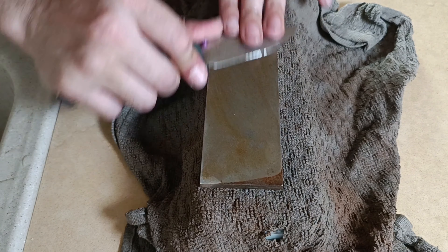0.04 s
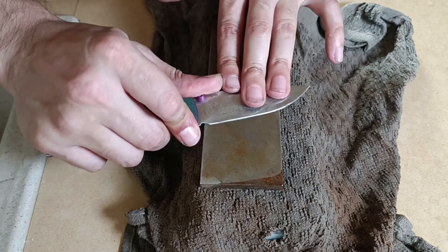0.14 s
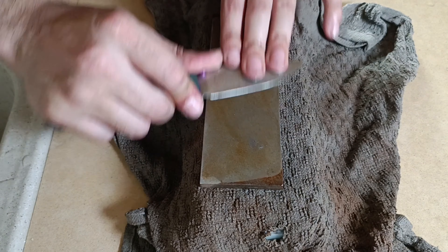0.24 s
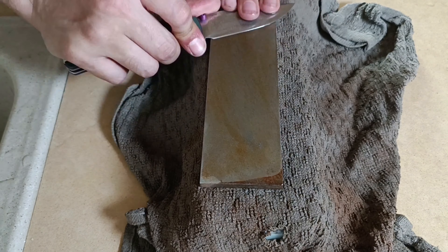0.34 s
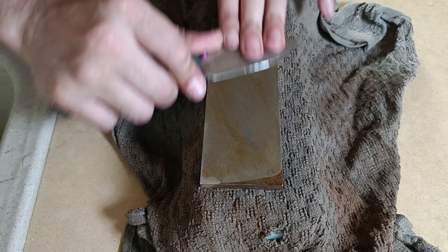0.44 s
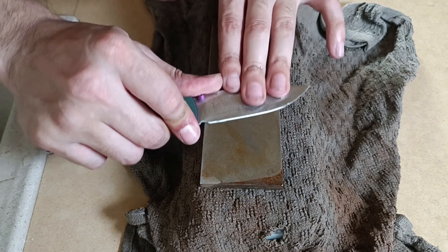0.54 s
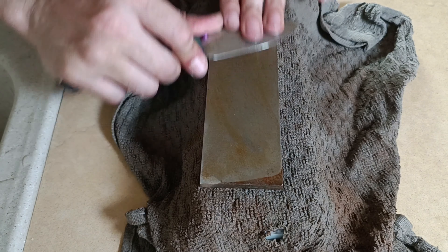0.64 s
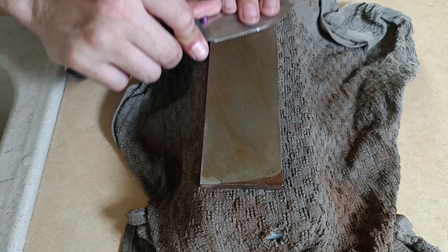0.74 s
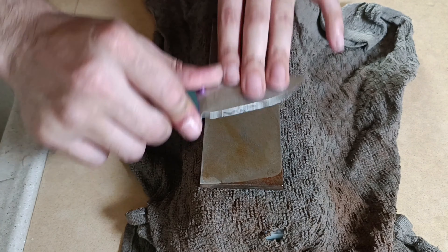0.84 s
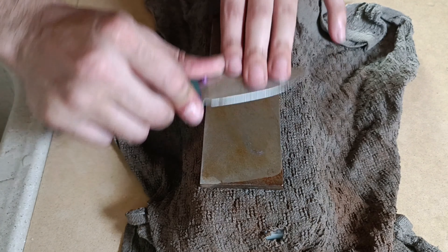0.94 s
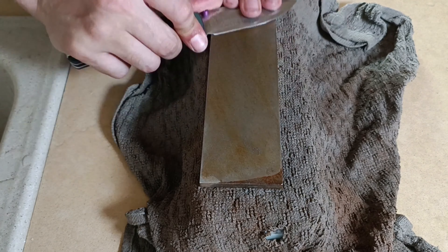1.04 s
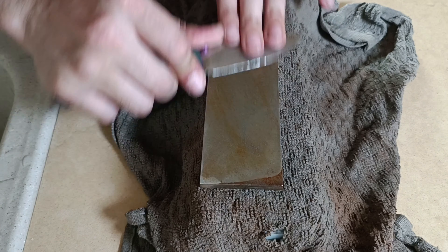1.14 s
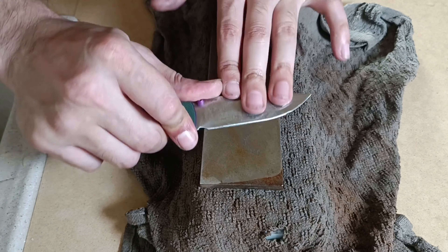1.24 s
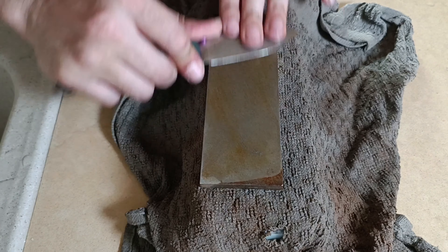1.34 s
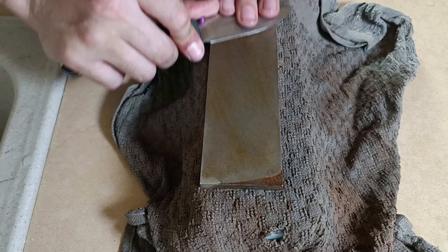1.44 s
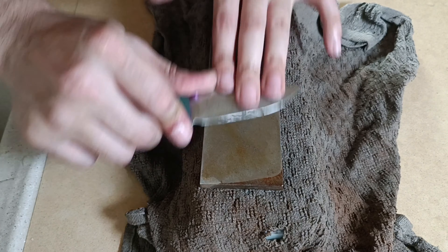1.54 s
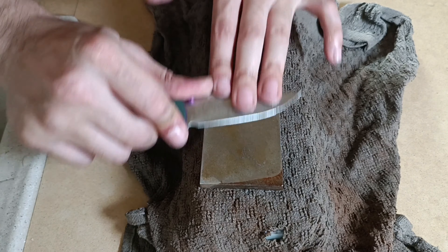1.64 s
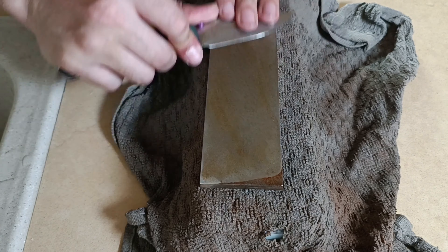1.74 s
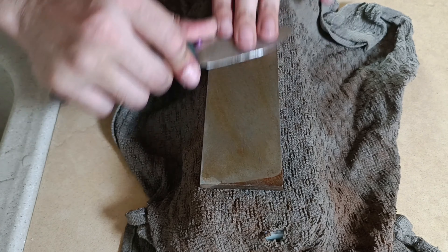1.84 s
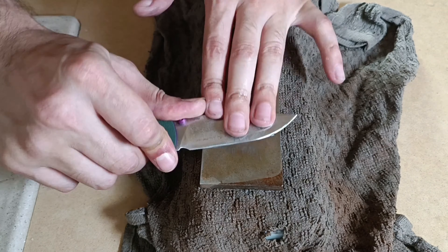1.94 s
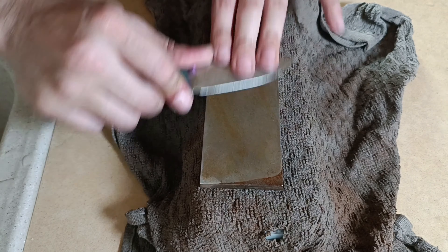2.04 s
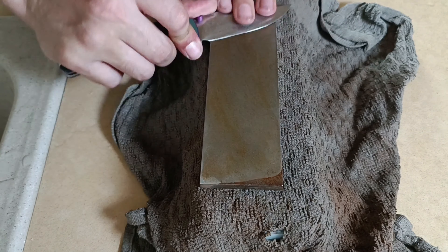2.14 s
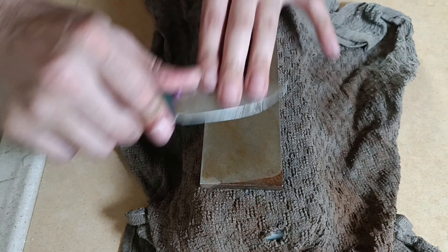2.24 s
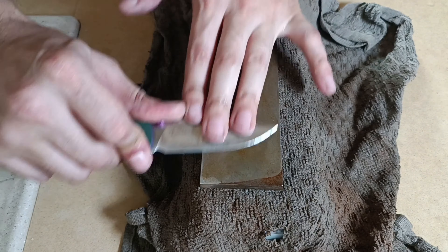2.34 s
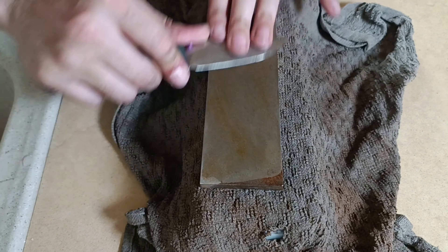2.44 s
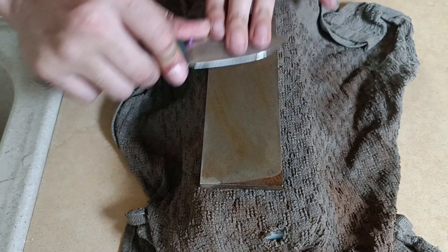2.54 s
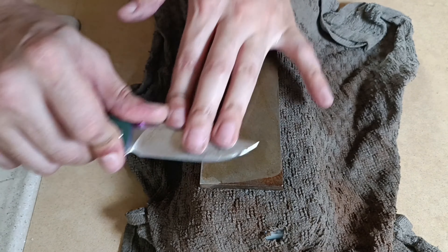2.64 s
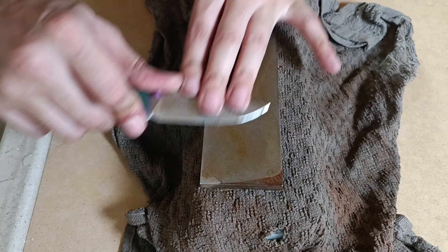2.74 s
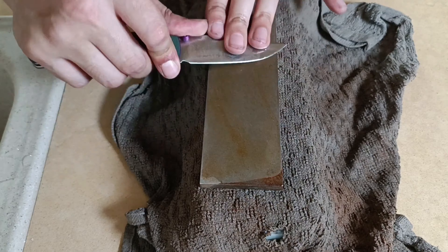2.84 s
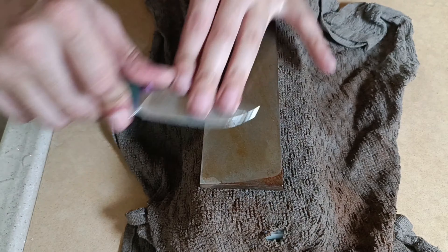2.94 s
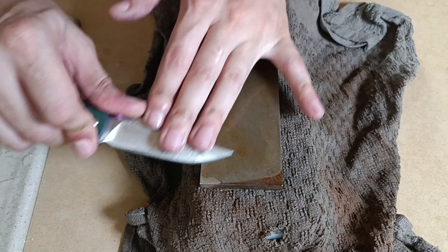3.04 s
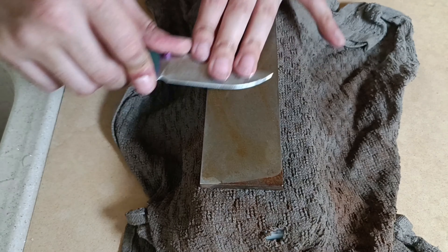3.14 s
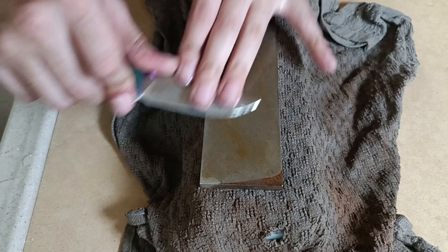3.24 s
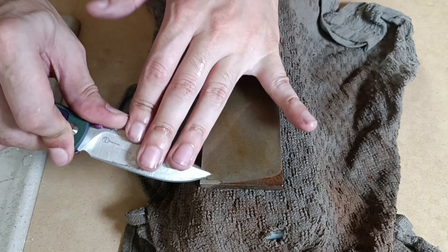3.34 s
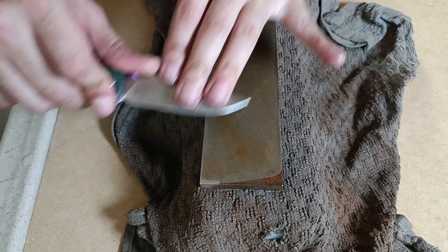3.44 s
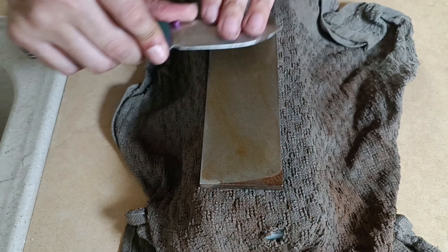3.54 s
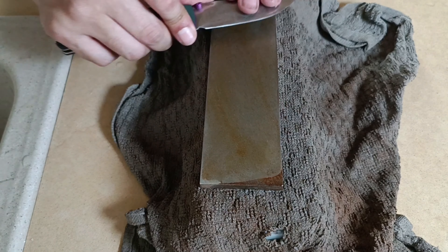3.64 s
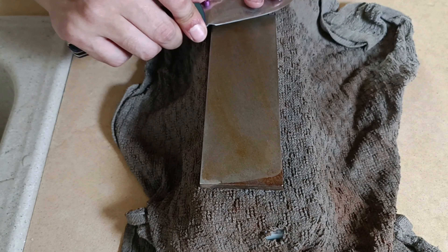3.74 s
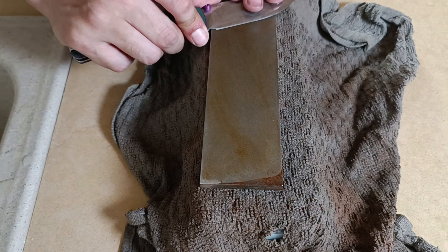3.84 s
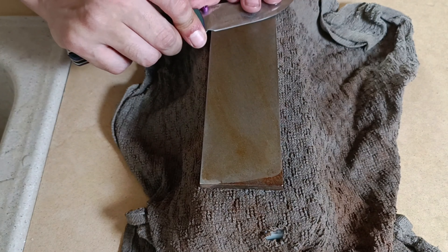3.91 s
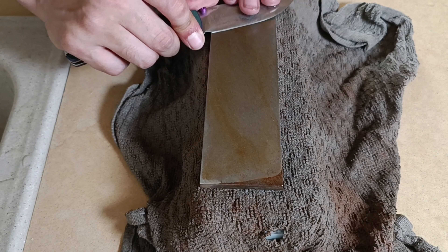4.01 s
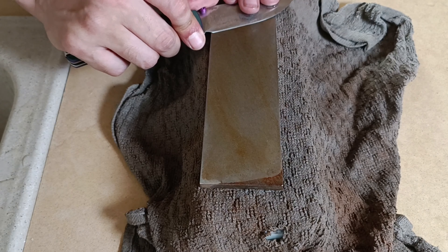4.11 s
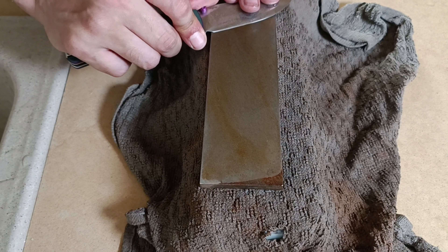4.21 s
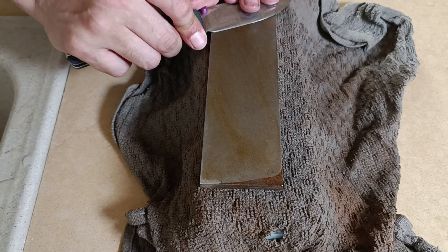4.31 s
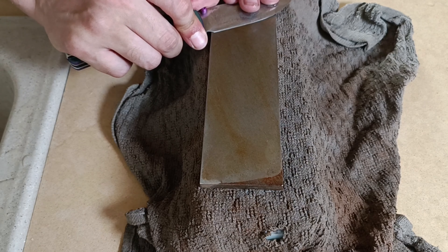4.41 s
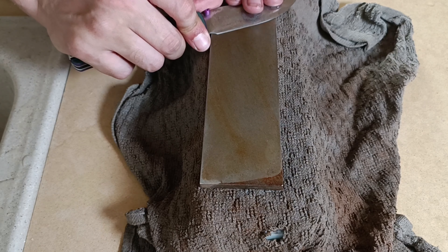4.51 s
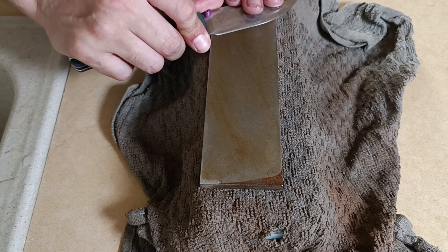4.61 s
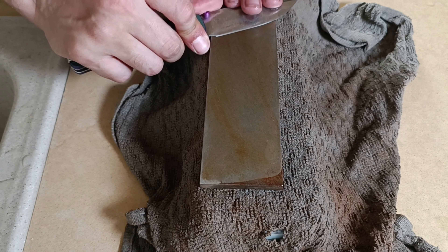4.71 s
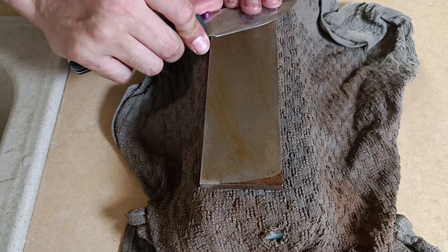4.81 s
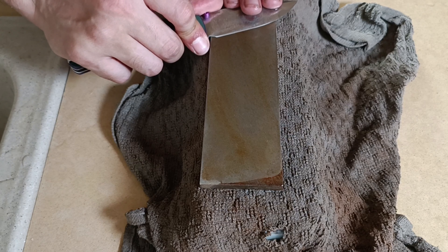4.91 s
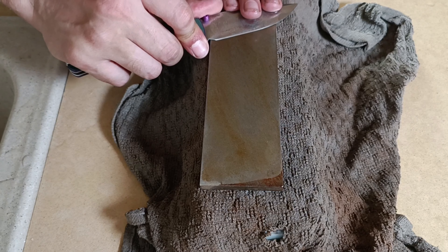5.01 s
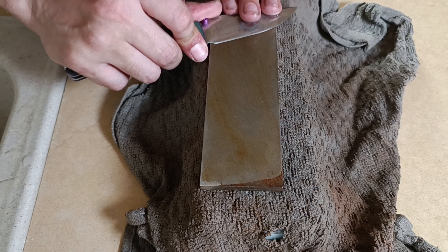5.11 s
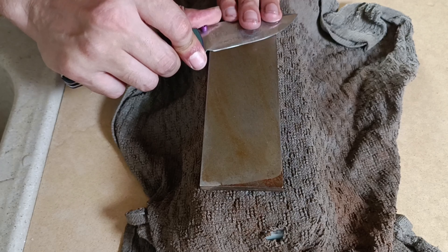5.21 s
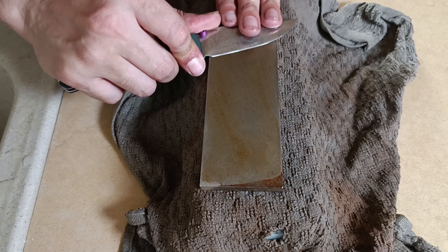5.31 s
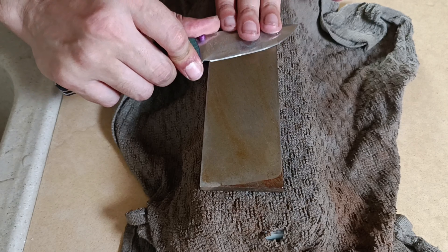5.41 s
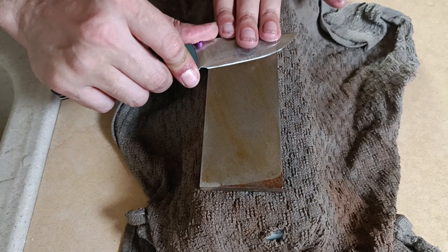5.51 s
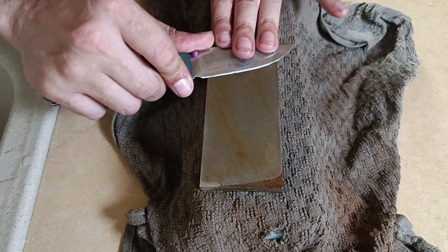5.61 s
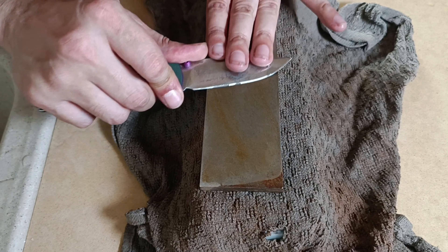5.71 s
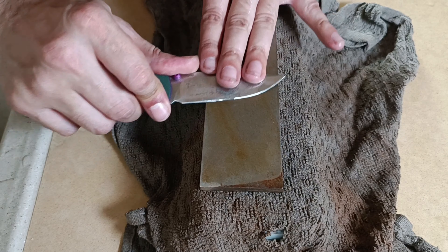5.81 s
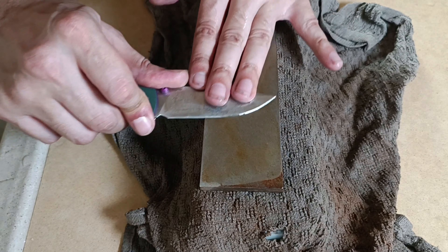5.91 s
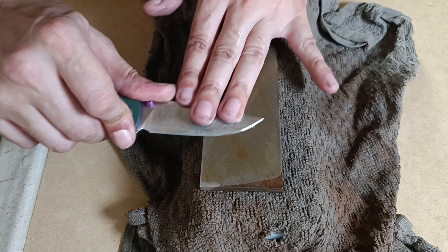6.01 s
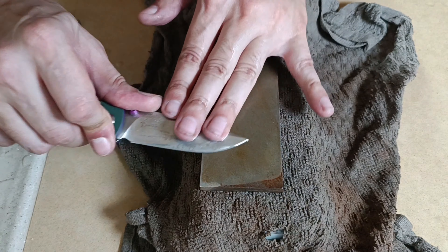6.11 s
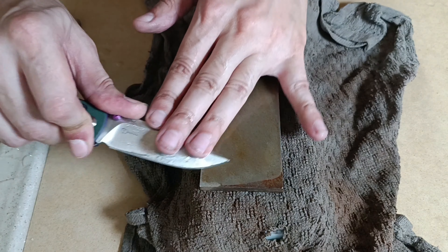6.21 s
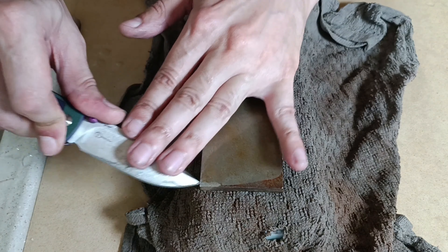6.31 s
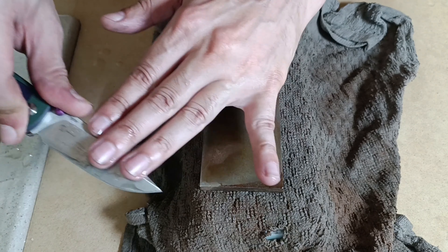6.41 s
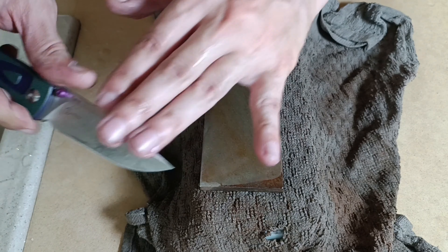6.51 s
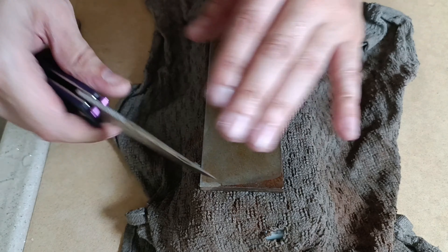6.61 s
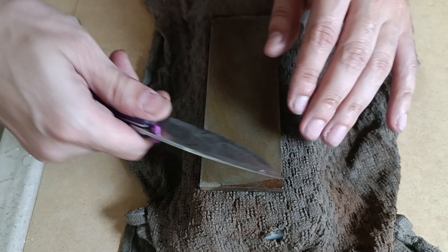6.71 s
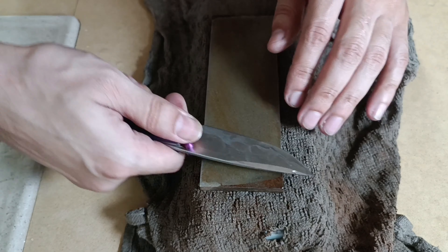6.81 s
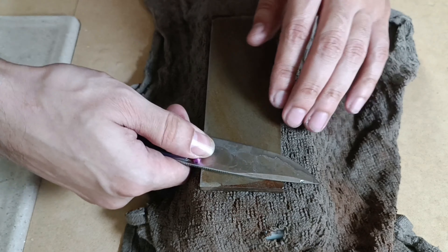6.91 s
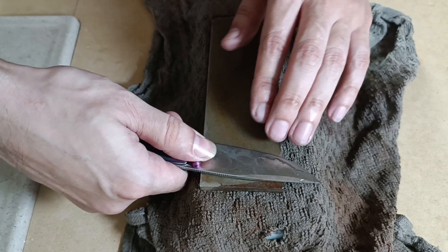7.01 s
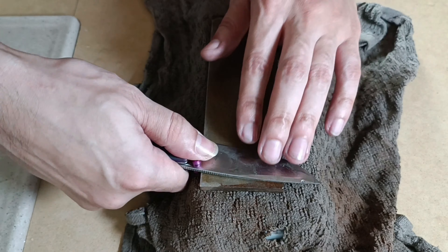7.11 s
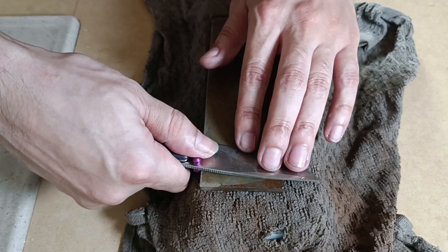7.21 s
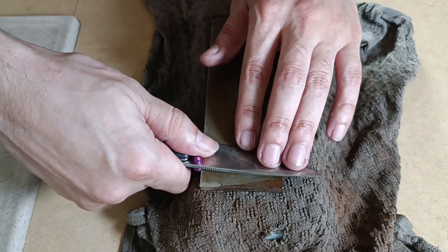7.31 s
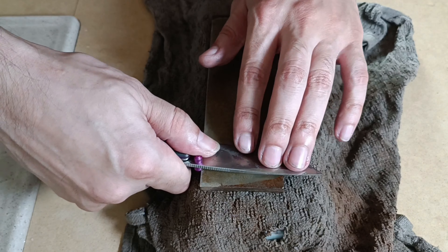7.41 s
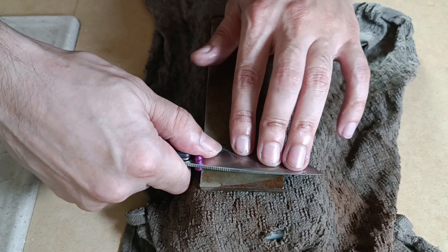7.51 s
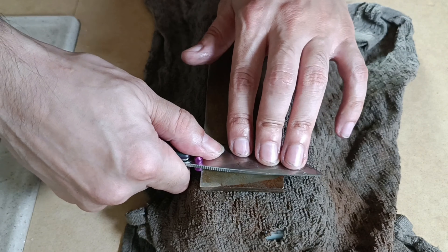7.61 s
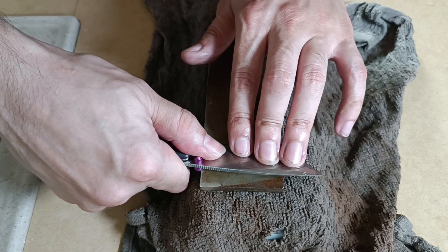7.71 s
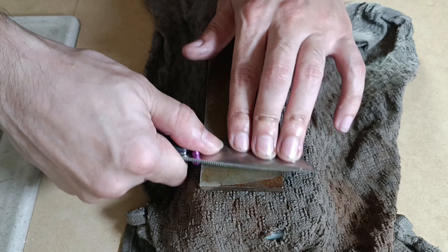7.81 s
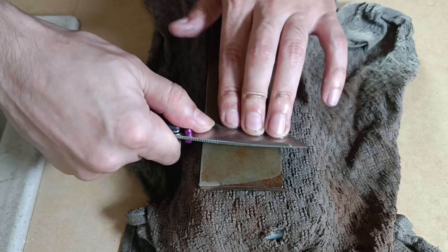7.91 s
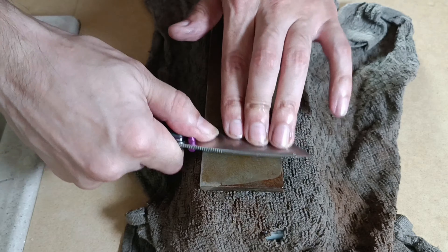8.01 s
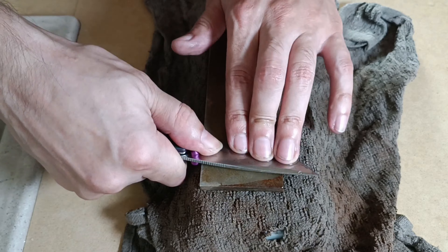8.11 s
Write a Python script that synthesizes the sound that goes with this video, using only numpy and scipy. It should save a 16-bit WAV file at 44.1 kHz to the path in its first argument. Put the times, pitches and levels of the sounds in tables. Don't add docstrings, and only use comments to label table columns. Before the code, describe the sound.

From 0 to 3.5 seconds a knife is rubbed quickly back and forth on a coarse abrasive plate, each stroke about 0.18 seconds: dry, bright, grainy rasps with snags and a ringing steel edge, the pitch colour shifting and turning thinner and more singing toward the tip. The loudest strokes fall around 2 to 2.8 seconds. It stops; at 4.0 the blade lands with a small metallic clack, then faint ticks and nudges. From about 5.2 little creeping slips lead into one slow, softer scrape, fullest from 5.9 to 6.5. Near quiet follows until a sharper clack with a brief steel ring at 7.03, smaller taps up to 7.7, and short scrapes from 7.9 to the end. Dull low worktop hums accompany the pushes. Close stereo pickup, short kitchen reverberation, faint hiss and distant fridge murmur.

```python
import sys
import numpy as np
from scipy import signal
from scipy.fft import rfft, irfft
from scipy.io import wavfile
from scipy.ndimage import uniform_filter1d

SR = 44100
rng = np.random.default_rng(int(sys.argv[2]) if len(sys.argv) > 2 else 0)


def boost_factor(decibels):
    exponent = np.asarray(decibels, float) / 20
    return 10 ** exponent


def store_wav(level_fs):
    pcm = np.round(np.clip(np.atleast_2d(level_fs), -1, 1) * 32767)
    wavfile.write(sys.argv[1], SR, pcm.T.astype(np.int16))


N = 359415


def evened(x):
    return x / np.sqrt(np.mean(x ** 2) + 1e-20)


def read(points, hz):
    f, value = np.transpose(points)
    return np.interp(np.log(hz + 1), np.log(f + 1), value)


def humps(modes, hz):
    return 10 * np.log10(sum(boost_factor(db) ** 2 / (1 + (2 * (hz - f) / w) ** 2) for f, w, db in modes))


def causal(gain_db):
    log = np.log(boost_factor(np.maximum(gain_db, -100)))
    full = np.concatenate([log, log[-2:0:-1]])
    return np.fft.ifft(np.exp(np.conj(signal.hilbert(full)))).real[:len(log)]


def patches(shape, bins, frames):
    noise = rng.standard_normal(shape[::-1]).T
    return evened(uniform_filter1d(uniform_filter1d(noise, bins, 0), frames, 1))


def arch(t, start, length, top):
    u = np.clip((t - start) / length, 0, 1)
    warp = np.log(.5) / np.log(np.clip(top, .1, .9))
    return abs(np.sin(np.pi * u ** warp)) ** 0.98


# (turn [s], level [dB], place of the hardest bite [0-1], bite [dB], flex of the belly [dB])
STROKES = [(-0.03, -26, 0.06, 5.5, -1), (0.151, -26, 0.47, 6, 1.5), (0.329, -28.5, 0.32, 4, -1),
           (0.507, -21, 0.6, 1, 1), (0.68, -26.5, 0.57, 2, 1), (0.864, -25, 0.49, 4, 2),
           (1.041, -25, 0.45, 5, -0.5), (1.217, -25.5, 0.68, 2.5, 1), (1.385, -27, 0.68, 5.5, -0.5),
           (1.564, -24, 0.38, -3.5, 0.5), (1.749, -25.5, 0.78, 7, 1.5), (1.93, -24, 0.9, 3.5, -0.5),
           (2.106, -22.5, 0.73, 7.5, 3), (2.284, -19.5, 0.72, 5.5, -0.5), (2.47, -23.5, 0.6, 3, -2.5),
           (2.646, -23, 0.69, 7, -3), (2.824, -25.5, 0.86, 3.5, -3.5), (3.005, -26.5, 0.65, 5, -0.5),
           (3.173, -29.5, 0.54, 3.5, 3), (3.336, -25.5, 0.52, 7.5, 4)]
# (start [s], length [s], level [dB], place of the top [0-1], flex of the belly [dB])
SLIPS = [(3.993, 0.14, -53, 0.5, -4), (4.249, .1, -61, 0.1, 1), (4.55, .15, -48.5, 0.69, 3.5),
         (4.72, .17, -63, 0.5, 2), (5.058, 0.079, -52.5, 0.48, 0), (5.218, 0.085, -47.5, 0.6, 4),
         (5.266, 0.064, -49, 0.66, 3.5), (5.324, 0.051, -49.5, .5, 3), (5.372, 0.092, -49.5, 0.3, 1),
         (5.471, .05, -56.5, .4, 2), (5.528, .045, -55.5, .3, 3), (5.573, 0.03, -50, 0.2, 1),
         (5.622, 0.036, -51.5, .3, 0), (5.643, 0.057, -52, .3, 2.5), (5.728, 0.049, -65, .3, 2.5),
         (6.36, 0.038, -40, 0.6, -1), (6.452, 0.025, -30.5, 0.3, -3.5), (6.998, 0.03, -60, 0.5, 4),
         (7.036, 0.068, -50.5, 0.15, 11), (7.306, 0.0836, -62, 0.63, -8), (7.426, 0.097, -69, 0.21, -9),
         (7.562, .05, -60, 0, -4), (7.645, .12, -68, 0.38, -12), (7.933, 0.13, -30.5, 0.6, -5.5),
         (8.131, 0.031, -34, 0.68, 3)]
# (time [s], level [dB], flex of the belly [dB])
SLOW_DRAW = [
    (5.13, -77, -4),
    (5.3, -61.5, -0.5),
    (5.5, -66, -1.5),
    (5.66, -50, 2.5),
    (5.87, -38, 3.5),
    (6.2, -38, -4),
    (6.38, -37, 4),
    (6.47, -35, 1.5),
    (6.5, -58.5, 1),
]
# (time [s], peak [dB])
SNAGS = [(0.2224, -18.5), (0.3492, -21), (0.5267, -21), (0.5482, -12), (0.8819, -23), (0.9268, -15.5),
         (1.0865, -16), (1.1044, -14), (1.1179, -13), (1.2381, -20), (1.2611, -18.5), (1.301, -17.5),
         (1.4452, -20.5), (1.4711, -17), (1.505, -13.5), (1.5794, -24), (1.5928, -23.5), (1.6262, -14.5),
         (1.7106, -17), (1.7644, -19.5), (1.8467, -8), (1.945, -20), (1.9635, -17), (2.0533, -14),
         (2.1191, -22.5), (2.1346, -16), (2.1855, -13.5), (2.2129, -12.5), (2.3072, -13.5), (2.3262, -13.5),
         (2.3735, -13), (2.385, -9.5), (2.4913, -18), (2.5317, -15.5), (2.5467, -15.5), (2.6594, -21),
         (2.6694, -16), (2.7188, -13), (2.7362, -8.5), (2.85, -19), (2.9038, -14.5), (2.9253, -17.5),
         (2.9522, -17.5), (3.0435, -22.5), (3.0765, -16.5), (3.0914, -12), (3.2096, -24), (3.2351, -20),
         (3.3788, -20.5), (3.3907, -14)]


def rubbing(t):
    last_lift_s, pause_s = 3.512, 0.0066
    fastest, turn_db, bite_width = 0.44, -22.5, 0.19
    snag_db, snag_rise_s, snag_fall_s = -17, .003, 0.011
    at, draw_db, draw_flex = np.transpose(SLOW_DRAW)
    level = np.interp(t, at, boost_factor(draw_db), 0, 0)
    flex = np.interp(t, at, draw_flex, 0, 0)
    pull = np.zeros(len(t))
    ends = [row[0] for row in STROKES][1:] + [last_lift_s]
    for k, ((start, db, place, bite_db, flex_db), end) in enumerate(zip(STROKES, ends)):
        length = end - start
        bite = bite_db * np.exp(-(((t - start) / length - place) / bite_width) ** 2)
        during = (t >= start) & (t < end)
        speed = arch(t, start + pause_s, length - 2 * pause_s, fastest) + boost_factor(turn_db) * during
        level = level + boost_factor(db + bite) * speed
        pull = pull + k % 2 * during
        flex = flex + flex_db * during
    for start, length, db, top, flex_db in SLIPS:
        level = level + boost_factor(db) * arch(t, start, length, top)
        flex = flex + flex_db * ((t >= start) & (t < start + length))
    for start, db in SNAGS:
        since = np.maximum(t - start, 0)
        level = level + boost_factor(db + snag_db) * (1 - np.exp(-since / snag_rise_s)) * np.exp(-since / snag_fall_s)
    return level, pull, flex


def grains(effort_db):
    per_s, spread_db, clump_db = 12000., -0.5, -1.04
    chance, sign, size = rng.random(N), rng.standard_normal(N), rng.exponential(1, N)
    clumps = np.clip(evened(uniform_filter1d(rng.standard_normal(N), size=90)), -2, 2)
    bite = np.clip((effort_db + 43.0) / 48.0, .2, 1.5)
    strength_db = spread_db * np.minimum(size, 3.3) + clump_db * bite * clumps
    return sign * boost_factor(strength_db) * (chance < per_s / SR)


# (frequency [Hz], width [Hz], level [dB])
BLADE = [(565, 50, -6.5), (845, 130, -15.5), (1828, 105, -10), (2310, 35, -31.5), (2660, 110, -10),
         (3140, 540, -16), (4220, 25, -32), (4973, 180, -5.5), (5610, 80, -6.5), (6564, 72, 0.5),
         (7500, 130, -7), (7390, 34, -2.5), (8300, 150, -3.5), (8400, 22, -11), (10700, 550, -21.5),
         (11100, 47.4, -19), (11600, 27, -21.5)]
# (frequency [Hz], level [dB per Hz])
HEEL_GRIT = [(260, -76), (450, -35.5), (562, -4.5), (1000, -5), (1550, -47), (1820, -15.5), (2340, -24),
             (2520, -6.5), (3400, -27.5), (3710, -7.5), (5000, -19.5), (6160, -15), (7250, -5),
             (8930, -26.5), (15700, -26.5)]


def blade_ring(hz):
    return 10 * np.log10(1 + boost_factor(humps(BLADE, hz) + 1.5 - read(HEEL_GRIT, hz)) ** 2)


# (frequency [Hz], level [dB per Hz])
TIP_GRIT = [(260, -56.5), (450, -37.5), (633, -16.5), (703, -29), (1050, -24), (1270, -24.5), (1820, -19),
            (2340, -15.5), (5000, -24), (5980, -21), (7360, 9), (8540, -3), (9060, -19.5), (10800, -18),
            (15700, -17.5)]
# (time [s], belly pitch [Hz], edge pitch [Hz])
FREE_RUN = [(0.0, 4850, 7200), (0.6, 4600, 6920), (1.2, 4900, 7300), (1.5, 4300, 7200), (1.7, 4900, 7300),
            (1.85, 3800, 7040), (2.05, 4400, 7500), (2.14, 3900, 7400), (2.29, 4300, 7100),
            (2.45, 5300, 7660), (2.55, 4250, 6750), (2.63, 4700, 6900), (2.72, 4600, 8330),
            (2.96, 4050, 8100), (3.14, 5200, 7600), (3.3, 4900, 7500), (3.42, 5500, 7500),
            (3.5, 5300, 8000)]
# (time [s], belly pitch [Hz], edge pitch [Hz])
FREE_AFTER = [(3.999, 4380, 7500), (4.6, 3800, 7400), (5.07, 5000, 7400), (5.2, 3800, 7400),
              (5.59, 3700, 7350), (5.78, 3900, 7500), (5.89, 4250, 7450), (6.0, 4800, 7350),
              (6.1, 4700, 8200), (6.17, 4600, 8350), (6.28, 4800, 8200), (6.33, 5050, 7800),
              (6.46, 5100, 8200), (6.55, 5700, 8200), (6.999, 4120, 7400), (8.002, 5200, 8000)]
# (time [s], lift [dB])
SING = [(0, 3), (1.85, 7), (2.35, 11), (3.2, 10), (3.42, 14), (4.0, 8), (4.2, 4), (5.5, 7), (5.62, 11),
        (5.8, 10), (5.95, 15), (6.1, 9), (6.22, 4), (6.36, 12), (6.47, 8), (8.0, 2)]


def sliding_colour(f, frames, tip, light):
    at, *pitches = np.transpose(list(FREE_RUN) + list(FREE_AFTER))
    belly_hz, edge_hz = (np.interp(frames, at, pitch) for pitch in pitches)
    sing_db = np.interp(frames, *np.transpose(SING))
    colour_db = np.outer(read(TIP_GRIT, f) - read(HEEL_GRIT, f), tip)
    hz = np.fft.rfftfreq(8192, 1 / SR)
    ring = np.interp(f, hz, uniform_filter1d(blade_ring(hz), size=16))
    colour_db = colour_db + np.outer(ring, .1 * light - .15 - .7 * tip)
    # (pitch [Hz], lift [dB], half width [Hz])
    resonances = ((belly_hz, sing_db, 260.), (edge_hz, 4.5, 350.),
                  (1.43 * edge_hz, 14.0 * tip, 450.), (4950., 5.0 * light, 110.))
    for hz_now, lift_db, half_hz in resonances:
        colour_db = colour_db + lift_db / (1 + ((f[:, None] - hz_now) / half_hz) ** 2)
    hollow = 1 + ((f[:, None] - .65 * belly_hz) / 650.0) ** 4
    return colour_db - 12.0 * tip / hollow


def balanced(z, f, plate, belly, fizz):
    power = uniform_filter1d(abs(z) ** 2, size=40, axis=1)

    def band_db(lo, hi):
        return 10 * np.log10(power[(f > lo) & (f < hi)].sum(0))

    edge = band_db(6200, 8700)
    # (wanted level [dB], band low and high [Hz], fade-in start and fade-out end [Hz])
    parts = ((plate, 500, 1200, 0, 2000), (belly, 3200, 6000, 2000, 6500), (fizz, 9000, 15500, 8500, SR))
    shift_db = 0
    for wanted, lo, hi, a, b in parts:
        reach = np.interp(f, [a, lo, hi, b], [a == 0, 1, 1, b == SR])
        shift_db = shift_db + np.outer(reach, wanted + edge - band_db(lo, hi))
    main = (power * boost_factor(2 * shift_db))[(f > 3000) & (f < 9000)].sum(0)
    return z * boost_factor(shift_db) / np.sqrt(main * 3)


# (time [s], place from heel 0 to tip 1)
CONTACT = [(0, 0.22), (1.2, 0.25), (1.9, 0.45), (2.22, 0.54), (2.4, 0.71), (2.57, 0.67), (2.74, 0.86),
           (2.92, 0.84), (3.09, 0.77), (3.47, 0.83), (3.999, 0.037), (5.301, 0.027), (5.68, 0.14),
           (6.02, 0.61), (6.2, 0.47), (6.38, 0.72), (6.999, 0.41), (8.002, 0.071)]
# (frequency [Hz], drift [radians])
WANDER = [(400, 0.24), (1500, 0.75), (3500, 2.1), (5500, 2.1), (6600, 1.8), (7000, 0.23), (8000, 1.3),
          (9500, 0.54), (15000, 0.46)]


def rasp():
    frame, hop = 512, 128
    t, hz = np.arange(N) / SR, np.fft.rfftfreq(8192, 1 / SR)
    level, pull, flex = (np.interp(t, t[::16], curve) for curve in rubbing(t[::16]))
    effort_db = 20 * np.log10(level + 1e-4)
    shelf = 16.0 * (hz > 8550) * np.exp(-abs(hz - 8550) / 210.0)
    strike = causal(read(HEEL_GRIT, hz) + blade_ring(hz) - shelf)
    rung = signal.oaconvolve(grains(effort_db), strike)[:N]
    f, frames, z = signal.stft(rung, SR, nperseg=frame, noverlap=frame - hop)

    tip = np.clip(np.interp(frames, *np.transpose(CONTACT)), 0, 1)
    over_db = np.maximum(np.interp(frames, t, effort_db) + 22, -26.0)
    light = np.clip(-over_db / 26.0, 0, 1)
    pulled, flex_db = (uniform_filter1d(np.interp(frames, t, c), size=9) for c in (pull, flex))
    broad = 1.5 * (1.88 - 1.3 * light) * patches(z.shape, bins=3, frames=28)
    flecks = 2.0 * patches(z.shape, bins=4, frames=7)
    z = z * boost_factor(sliding_colour(f, frames, tip, light) + broad + flecks)

    plate = -11.5 - 21 * tip - 0.3558 * over_db + 2 * pulled
    belly = 0.5 - 6.5 * tip + 0.1029 * over_db + 1.5 * pulled
    fizz = -13.5 + 2.5 * tip - 0.1763 * over_db + 1 * pulled
    z = balanced(z, f, plate, belly + flex_db, fizz)

    drift = patches(z.shape, bins=6, frames=70) * np.outer(read(WANDER, f), 1 - 0.55 * light)
    swing = np.exp(.5j * drift) * boost_factor(1.5 * (tip - .3) / 2)
    pair = signal.istft([z * swing, z / swing], SR, nperseg=frame, noverlap=frame - hop)[1]
    return pair[:, :N] * level


# (time [s], peak [dB], part below the edge ring [dB],
# pitch of the free length [Hz], its level [dB])
TAPS = [(3.991, -31, -8, 4370, -6), (4.404, -60, -16, 7400, -8), (4.504, -58, -16, 7180, -8),
        (4.827, -58, -12, 3900, -6), (4.927, -56, -18, 7300, -7), (5.063, -50, -12, 7380, -10),
        (6.244, -38, -38, 8300, -12), (6.306, -35, -38, 8300, -12), (5.036, -60, -18, 7400, -9),
        (5.123, -50, -14, 7400, -10), (5.301, -40, -16, 7400, -12), (5.376, -44, -15, 4900, -10),
        (5.4, -44, -15, 4900, -10), (5.654, -43, -16, 3800, -12), (5.932, -35, -24, 7400, -12),
        (5.951, -37, -24, 7400, -12), (6.38, -36, -38, 8000, -12), (6.793, -58, -20, 7400, -9),
        (6.671, -54, -23, 7400, -9), (7.362, -51, -19, 7310, -8), (7.437, -56, -22, 8360, -9),
        (7.558, -47, -15, 7500, -8), (7.025, -21, -15, 4400, -19), (7.037, -30, -14, 3800, -13),
        (7.6935, -40, -14, 5300, -16)]
# (frequency [Hz], level [dB per Hz])
CRACK = [(290, -1.5), (500, -21), (2130, 1), (4340, 0.5), (6140, -6.5), (7420, 4.5), (9090, -17),
         (10800, -11.5), (16000, -44)]
# (frequency [Hz], level [dB], t60 [s])
STEEL = [(1694, 5, 0.12), (2430, -48, 0.14), (3330, -13, 0.36), (3620, -32, 0.13), (4730, -33, 0.71),
         (5300, -4, 0.15), (6040, -80.5, 0.11), (6900, -47, 0.18), (7200, -44, 0.14), (7700, -7, 0.072),
         (7600, -4, 0.2), (10900, -33, 0.23)]
# (ratio, level [dB])
PARTIALS = [(.59, -4), (1, 0), (1.19, -3)]


def taps():
    crack_s, ring_db, body_db, damped_t60_s = 0.0057, -25.0, 10.0, .032
    out, t = np.zeros(N + 4000), np.arange(4000) / SR
    colour = causal(read(CRACK, np.fft.rfftfreq(2048, 1 / SR)))
    under = signal.butter(2, 5800, fs=SR)
    for start, db, under_db, hz, spot_db in TAPS:
        noise = rng.standard_normal(4000)
        ring = 0
        for f, mode_db, t60 in STEEL:
            louder, detune = rng.uniform(-2.2, 1, 2)
            decay = boost_factor(mode_db + 1.8 * louder - 60 * t / min(damped_t60_s, t60))
            ring = ring + decay * np.sin(2 * np.pi * f * (1 + 0.0057 * detune) * t)
        rattle = 1 + .45 * evened(uniform_filter1d(noise, size=300))
        spot = rattle * sum(boost_factor(spot_db + d - 60 * t / damped_t60_s) * np.sin(2 * np.pi * r * hz * t)
                            for r, d in PARTIALS)
        crack = signal.oaconvolve(noise * np.exp(-t / crack_s), colour)[:4000]
        tap = crack / abs(crack).max() + boost_factor(ring_db) * ring * rattle
        tap = tap + (boost_factor(under_db + body_db) - 1) * signal.lfilter(*under, tap)
        tap = tap / abs(tap).max() + spot
        out[round(start * SR):][:4000] += boost_factor(db) * tap / abs(tap).max()
    return signal.lfilter(*signal.butter(2, 450, "high", fs=SR), out[:N])


# (time [s], frequency [Hz], level [dB], t60 [s])
RINGS = [(3.991, 4390, -34, .035), (4.035, 4390, -57, .15), (4.068, 4400, -56, .25),
         (3.991, 5200, -41, .025), (4.04, 5200, -61, .4), (3.991, 7900, -41, .022), (3.991, 1750, -44, .03),
         (3.996, 2560, -53, .16), (4.04, 1800, -60, .3), (3.991, 650, -47, .06), (7.025, 7360, -31, .04),
         (7.025, 4300, -35, .05), (7.025, 5210, -37, .05), (7.025, 3480, -38, .05), (7.026, 1500, -42, .05),
         (7.038, 7400, -37, .04), (7.04, 7450, -50, .4), (7.04, 7150, -56, .3), (7.047, 6300, -46, .04),
         (7.038, 1800, -35, .045), (7.038, 3800, -35, .05), (7.04, 3800, -57, .45), (7.04, 4390, -55, .4),
         (7.04, 2640, -54, .4), (7.694, 2750, -44, .022), (7.694, 6300, -48, .02), (7.694, 5300, -52, .025),
         (7.693, 900, -48, .03), (7.025, 10700, -48, .04), (7.03, 10600, -62, .3), (7.557, 4200, -57, .06),
         (7.557, 1900, -60, .05)]


def rings():
    out, t = np.zeros(N + 12000), np.arange(12000) / SR
    for start, hz, db, t60 in RINGS:
        chatter = .9 * evened(uniform_filter1d(rng.standard_normal(len(t)), size=150))
        shake = 1 + chatter * np.minimum(t / 0.0067, 1)
        attack = np.minimum(t / 0.00061, 1)
        mode = boost_factor(db - 60 * t / t60) * np.sin(2 * np.pi * hz * t)
        out[round(start * SR):][:len(t)] += shake * attack * mode
    return out[:N]


# (frequency [Hz], phase [radians])
LEAD = [(200, 0), (450, -.3), (1000, .4), (1500, 1.1), (2000, .6), (3000, 1.1), (4600, 1.4), (6000, 1.2),
        (6600, .5), (6950, 0)]
# (frequency [Hz], difference [dB])
TILT = [(1000, -1), (1400, 2), (2500, -2.5), (3500, 1.5), (5000, 0), (6500, 5), (7400, 3.5), (8200, 1),
        (8700, -1.5), (16000, -0.6)]


def ports(x):
    hz = np.fft.rfftfreq(N, 1 / SR)
    half = boost_factor(read(TILT, hz) / 2) * np.exp(.5j * read(LEAD, hz))
    return irfft(rfft(x) * np.array([half, 1 / half]), N)


# (frequency [Hz], t60 [s])
KITCHEN = [(300, 0.44), (2000, 0.47), (5000, 0.34), (8000, 0.41), (14000, 0.3)]


def kitchen(x):
    echoes = np.zeros((2, SR))
    at = np.arange(200, SR - 20, 20) + rng.integers(0, 20, (2, (SR - 201) // 20))
    np.put_along_axis(echoes, at, rng.choice([-1., 1.], at.shape), 1)
    hz, t, z = signal.stft(echoes, SR, nperseg=256)
    tail = signal.istft(z * boost_factor(-60 * t / read(KITCHEN, hz)[:, None]), SR, nperseg=256)[1]
    return signal.fftconvolve(x[None], tail / np.linalg.norm(tail[0]), axes=1)[:, :N]


# (time [s], hum level [dB])
HAND_WEIGHT = [(0.0, -51.5), (1.45, -50.5), (1.54, -57), (1.61, -52), (3.29, -54), (3.47, -61),
               (3.56, -66.5), (4.86, -54), (4.95, -74), (5.13, -49.5), (5.24, -54.5), (5.36, -45),
               (6.38, -53), (6.42, -61.5), (7.88, -59.5), (8.15, -48)]
# (frequency [Hz], width [Hz], level [dB])
COUNTER_MODES = [(138, 14, -6), (94, 110, -12.5), (75, 63, -24)]


def counter():
    hz = np.fft.rfftfreq(N, 1 / SR)
    limits = (1 + (hz / 440.0) ** 4) * (1 + (88.0 / (hz + 1)) ** 4)
    hum = irfft(rfft(rng.standard_normal(N)) * boost_factor(humps(COUNTER_MODES, hz)) / limits, N)
    return evened(hum) * boost_factor(np.interp(np.arange(N) / SR, *np.transpose(HAND_WEIGHT)))


# (start [s], length [s], level [dB], pitch [Hz])
SHOVES = [(0.165, 0.064, -48, 125.4), (0.285, 0.018, -49, 130.6), (0.412, 0.095, -49, 134.7),
          (0.626, 0.1, -48, 140), (0.866, 0.14, -46, 139), (1.061, 0.05, -52, 129),
          (1.141, 0.065, -46, 133.7), (1.287, 0.098, -51, 132), (1.594, 0.11, -44, 140),
          (1.724, 0.055, -48, 135), (1.991, 0.076, -45, 136.1), (2.081, 0.072, -47.5, 134),
          (2.296, 0.035, -48.5, 137.3), (2.586, 0.049, -49, 137.7), (3.412, 0.094, -46, 139.3),
          (5.077, 0.1, -46.5, 138.5), (5.274, 0.26, -42, 140.9), (5.453, 0.49, -46.5, 135.8),
          (5.864, 0.16, -43.5, 137.3), (6.225, 0.15, -47, 140.4), (8.047, 0.026, -51.5, 126)]
# (start [s], length [s], level [dB], pitch [Hz])
THUMPS = [
    (3.981, 0.063, -56.5, 103.4),
    (4.66, 0.076, -58.5, 86.2),
    (4.9, .06, -67, 80.2),
    (6.47, 0.084, -63.5, 94.5),
    (7.021, 0.049, -57, 102),
    (7.96, 0.12, -54, 94.7),
]


def shoves():
    spill_s = 0.04017
    out = np.zeros(N + 2 * SR)
    for start, length, db, hz in list(SHOVES) + list(THUMPS):
        t = np.arange(0, length + 2 * spill_s, 1 / SR)
        hum = boost_factor(db + 3) * np.sin(np.pi * t / t[-1]) * np.sin(2 * np.pi * hz * t)
        out[round((1 + start - spill_s) * SR):][:len(t)] += hum
    return out[SR:SR + N]


# (frequency [Hz], level [dB per Hz])
AIR = [(15, -58.5), (30, -33), (55, -35.5), (102, -25.5), (125, -2), (192, -6.5), (270, -4.5), (344, -3),
       (528, -15), (718, -12.5), (1060, -30), (1500, -47), (1950, -57.5), (3300, -120)]
# (frequency [Hz], likeness [-1 to 1])
AIR_SAME = [(60, -0.85), (180, 0.96), (550, -0.16), (1650, -0.28), (4970, 0.226), (15000, 1)]
# (frequency [Hz], level [dB per Hz])
HISS = [(590, -37.5), (1000, -2), (1500, -3.5), (1940, -8), (2310, -8.5), (2780, -6.5), (3800, -9),
        (5020, -11), (8400, -11), (8750, -19.5), (16000, -15.5)]


def air():
    level_db, hiss_db, patchy_db = -55.5, -22.5, 2.0
    frames, hz = N // 512 + 5, np.fft.rfftfreq(2048, 1 / SR)
    a, b, c, d = rng.standard_normal((frames, 1025, 4)).T
    same = np.clip(read(AIR_SAME, hz), -1, 1)[:, None]
    left = a + 1j * b
    z = np.array([left, same * left + np.sqrt(1 - same ** 2) * (c + 1j * d)])
    gain = np.hypot(boost_factor(read(AIR, hz)), boost_factor(read(HISS, hz) + hiss_db))
    z = z * gain[:, None] * boost_factor(patchy_db * patches(a.shape, bins=20, frames=6))
    return boost_factor(level_db) * evened(signal.istft(z, nperseg=2048, noverlap=1536)[1][:, :N])


# (frequency [Hz], width [Hz], level [dB])
FRIDGE = [(161.6, 5, -67), (199.6, 5.6, -61), (241.5, 10, -66), (353.5, 3, -71), (398.7, 1.1, -66),
          (447.4, 2.5, -71)]


def fridge():
    hz, z = np.fft.rfftfreq(N, 1 / SR), rfft(rng.standard_normal((2, N)))
    z = np.array([z[0], 0.98 * z[0] + 0.95 * z[1]])
    return sum(boost_factor(db) * evened(irfft(z / (1 + (2 * (hz - f) / w) ** 2), N)) for f, w, db in FRIDGE)


def scene():
    rub, touch, steel = rasp(), taps(), rings()
    echoes = kitchen(boost_factor(-9.0) * rub[0] + boost_factor(-5.5) * touch + boost_factor(-15.5) * steel)
    return ports(rub + touch + steel + echoes) + counter() + shoves() + air() + fridge()


def low_pass(x):
    return signal.sosfilt(signal.butter(12, 15980, fs=SR, output="sos"), x)


def record(dry):
    hz = np.fft.rfftfreq(N, 1 / SR)
    treble = (hz < 15980) * boost_factor(2.8 * np.clip((hz - 13500) / 1500, 0, 1))
    bass = np.hypot(.16, 1 / np.sqrt(1 + (45.0 / (hz + 1)) ** 10))
    mix = irfft(rfft(dry) * treble * bass, N)
    return low_pass(mix)


dry = scene()
out = record(dry)
store_wav(out)
```